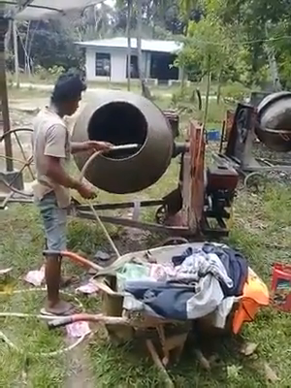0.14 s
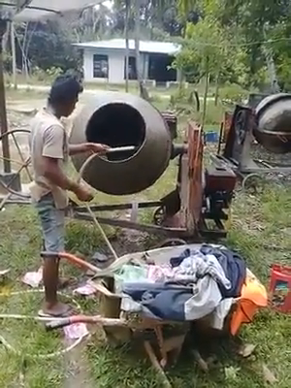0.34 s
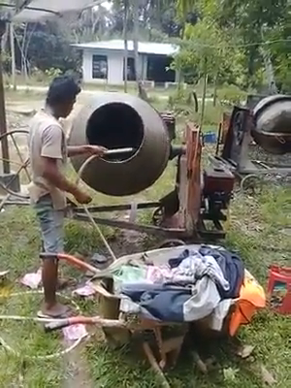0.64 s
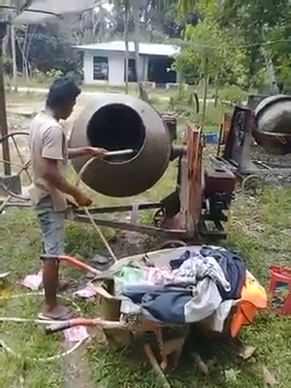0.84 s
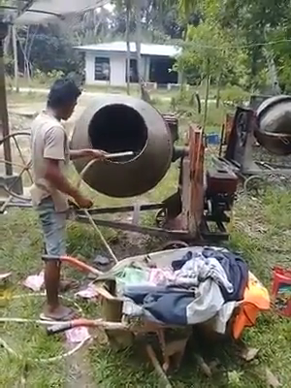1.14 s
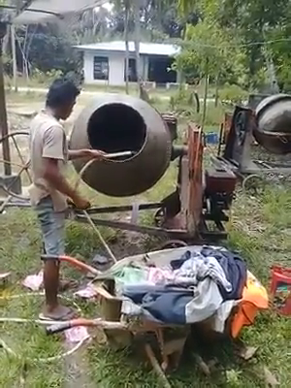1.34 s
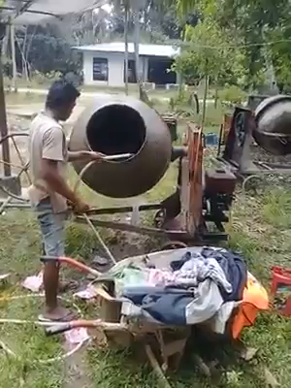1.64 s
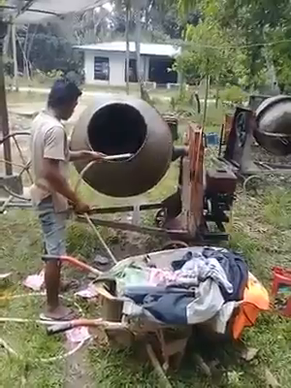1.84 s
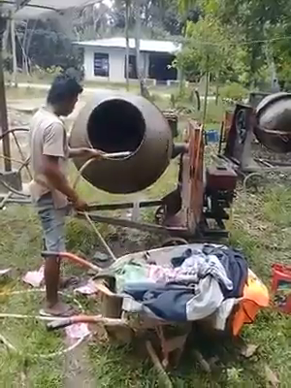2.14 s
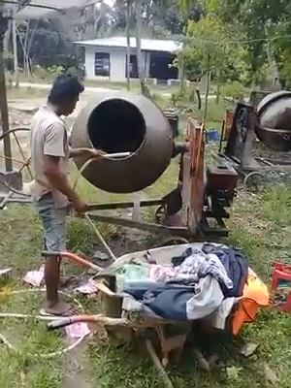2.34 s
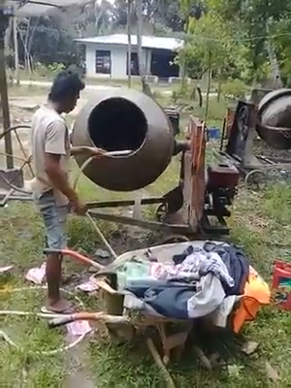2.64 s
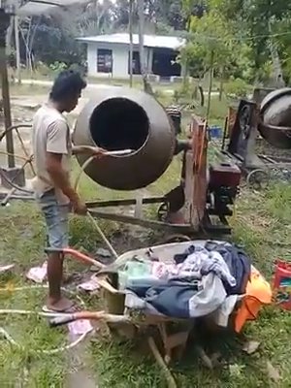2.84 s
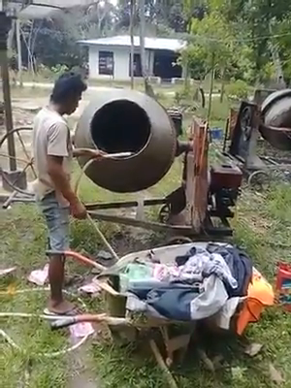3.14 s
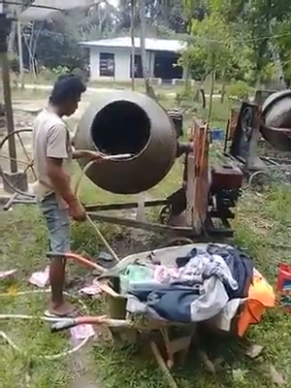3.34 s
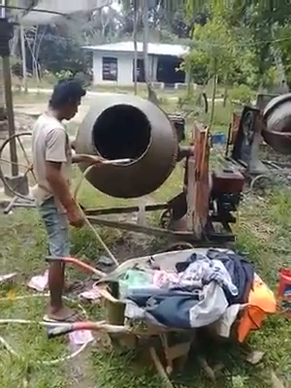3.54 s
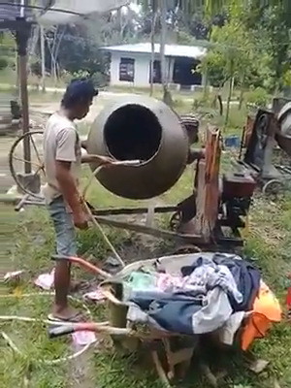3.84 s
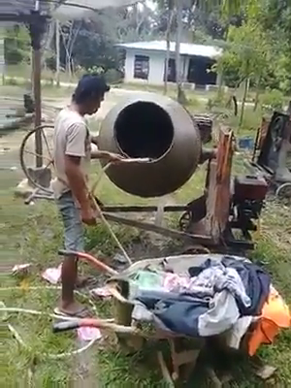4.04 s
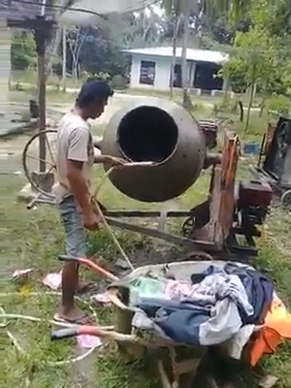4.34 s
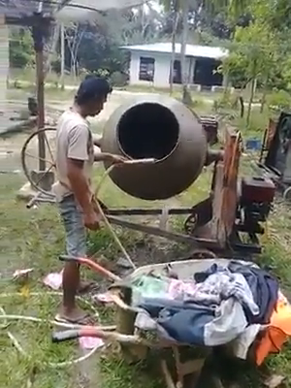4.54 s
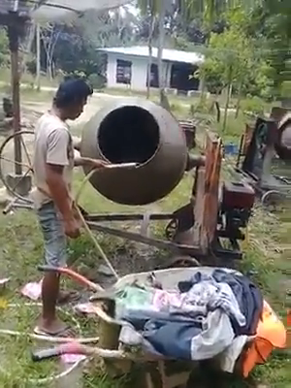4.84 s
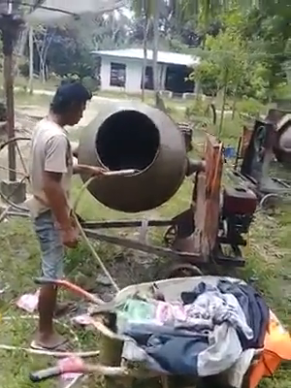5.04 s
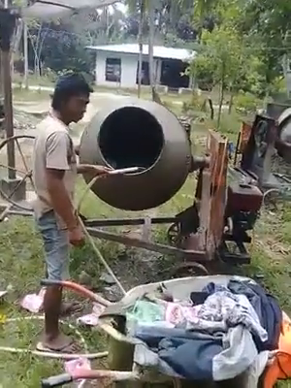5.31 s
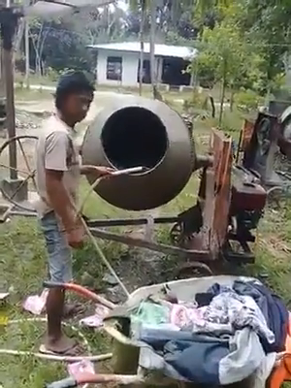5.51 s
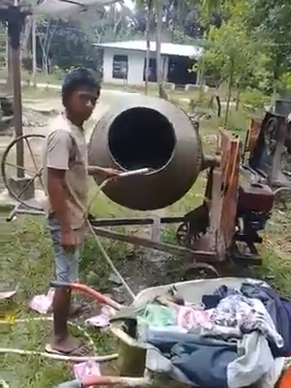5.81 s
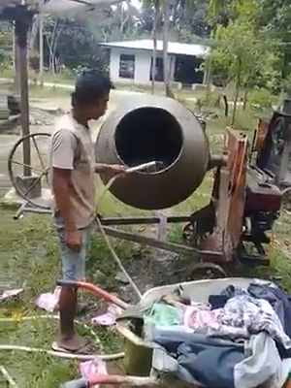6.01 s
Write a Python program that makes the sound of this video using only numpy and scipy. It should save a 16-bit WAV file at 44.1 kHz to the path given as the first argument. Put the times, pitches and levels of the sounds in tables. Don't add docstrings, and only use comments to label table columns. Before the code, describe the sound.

A slow single-cylinder engine chugs steadily about sixteen knocks a second, with a rough rattling drum roar and light wind thumps outdoors.

```python
import sys
import numpy as np
from scipy import signal
from scipy.fft import rfft, irfft
from scipy.io import wavfile
from scipy.ndimage import uniform_filter1d

SR = 44100
rng = np.random.default_rng(int(sys.argv[2]) if len(sys.argv) > 2 else 0)


def decibels_to_gain(level_db):
    exponent = np.asarray(level_db, float) / 20
    return 10 ** exponent


def transcribe(u):
    v = np.clip(np.atleast_2d(u).T, -1, 1)
    q = np.round(v * 32767).astype(np.int16)
    wavfile.write(sys.argv[1], SR, q)


N = 272097

# time in seconds, firings so far.
CRANK_PROGRESS = [(-.0223, -1), (.9117, 14), (2.0362, 32), (2.6579, 42), (3.5303, 56), (3.9672, 63),
                  (4.8442, 77), (5.7167, 91), (6.2137, 99)]
# start in seconds, peak in dB, pitch in Hz, rise in ms, decay in ms.
PORT_BUFFETS = [(0.029, -33, 60, 7, 15), (0.579, -22, 75.5, 11, 23), (0.715, -31, 48.4, 4.3, 16),
                (0.995, -24.5, 44, 3.7, 15), (1.046, -24.5, 85, 5, 10), (2.462, -30, 99.6, 3.5, 15),
                (2.793, -15, 82.4, 4.2, 11), (3.626, -19.5, 56.7, 5.3, 14), (3.689, -27.5, 83.4, 8.6, 17),
                (3.891, -25, 93, 4.7, 15), (4.17, -13, 77, 3.8, 21), (4.216, -26, 90, 4, 17),
                (4.350, -27, 80, 5.7, 10), (4.524, -21.5, 51.1, 8.2, 12), (4.938, -24, 50.6, 16, 14),
                (5.277, -19.5, 72, 4.5, 16), (5.523, -26.5, 94.5, 6.6, 6.4), (5.781, -23.5, 56.5, 11, 22),
                (6.002, -22, 57, 8.3, 39)]


def firing(firing_db, cover_db):
    # delay in ms, level in dB.
    knocks = [
        (0, 0),
        (16, -17),
    ]
    # pitch in Hz, width in Hz, peak in dB, start in ms, sign.
    block_modes = [(502, 50, -48, -3.4, 1), (587, 110, -33.5, -3.13, -1), (717, 141, -33.5, -3.13, 1),
                   (868, 146, -40, -2.8, 1), (1077, 283, -32.5, -3.4, -1), (1182, 294, -30.5, -3.28, 1),
                   (1696, 74, -48, -3.24, -1), (2375, 61, -50, -3.1, -1)]
    # pitch in Hz, width in Hz, peak in dB, start in ms, sign.
    cover_mode = (1322, 78, -35, -3.0, 1)
    blow = sum(decibels_to_gain(db) * each_cycle(ms - 4, spread_db=1.0) for ms, db in knocks)

    def uneven_blow():
        return blow * decibels_to_gain(1.2 * rng.standard_normal(N))

    block = sum(struck(uneven_blow(), *mode) for mode in block_modes)
    cover = struck(uneven_blow(), *cover_mode)
    return decibels_to_gain(firing_db) * (block + decibels_to_gain(cover_db) * cover)


def struck(clicks, hz, width_hz, db, start_ms, sign):
    t = np.maximum(np.arange(SR // 16) / SR - (start_ms + 4) / 1000, 0)
    decay = np.pi * width_hz
    swell = np.e * decay * t * np.exp(-decay * t)
    shape = swell * np.sin(2 * np.pi * hz * t)
    return sign * decibels_to_gain(db) * signal.oaconvolve(clicks, shape)[:N]


def each_cycle(delay_ms, spread_db):
    s, count = np.transpose(CRANK_PROGRESS)
    fired_s = np.interp(np.arange(-1, 100), count, s)
    at = np.round((fired_s + delay_ms / 1000) * SR).astype(int)
    size = decibels_to_gain(spread_db * rng.standard_normal(len(at)))
    inside = (at >= 0) & (at < N)
    clicks = np.zeros(N)
    clicks[at[inside]] = size[inside]
    return clicks


def exhaust():
    # multiple of the firing rate, level in dB rms.
    orders = [(8, -53), (11, -53), (12, -52), (15, -57), (17, -55.5), (19, -70), (24, -54)]
    # delay after the firing in ms, level in dB, pitch in Hz, width in Hz.
    puffs = [
        (2, -38, 341, 107),
        (16.04, -56, 240, 35),
        (30.14, -35, 380, 53),
    ]
    angle = 2 * np.pi * (in_time(CRANK_PROGRESS)[0] + 0.0964)
    out = np.zeros(N)
    for order, db in orders:
        out += decibels_to_gain(db + 2.6 * drift(5.3)) * np.sqrt(2) * np.cos(order * angle)
    for ms, db, hz, width_hz in puffs:
        once = ring(each_cycle(ms, spread_db=1.0), hz, width_hz)
        out += decibels_to_gain(db) * width_hz * 5.1 / SR * ring(once, hz, width_hz)
    return out


def ring(clicks, hz, width_hz):
    r = np.exp(-np.pi * width_hz / SR)
    w = 2 * np.pi * hz / SR
    return signal.lfilter([0, np.sin(w)], [1, -2 * r * np.cos(w), r * r], clicks + 1e-18)


def roar(roar_db, bass_db):
    # delay after the firing in ms, centre in Hz, width in octaves,
    # level in dB above the roar, decay in ms.
    rattles = [
        (1.48, 1530, 0.55, -8.5, 4.6),
        (36, 1800, 0.81, -18, 16),
    ]
    # frequency in Hz, density in dB per Hz.
    roar_spectrum = [(65, -7), (110, -6.5), (184, -3), (374, -2.5), (450, -8), (580, -8.5), (720, -3.5),
                     (999, -10.5), (1310, -3.5), (1450, -9.5), (1670, -5.5), (1950, -7.5), (2650, -3),
                     (3000, -6.5)]
    bursts = []
    for ms, _, _, _, decay_ms in rattles:
        fade = np.exp(-1000 / (decay_ms * SR))
        bursts.append(signal.lfilter([1], [1, -fade], each_cycle(ms, spread_db=3.0)))
    white, slosh, grit = rng.standard_normal((2, N)), drift(3.0), drift(99)
    edges = 90 * 2 ** (np.arange(19) / 3)
    out = np.zeros(N)
    for k, (low, high) in enumerate(zip(edges, edges[1:])):
        hz = np.sqrt(low * high)
        lift = np.zeros(N)
        for burst, (_, mid_hz, octaves, db, _) in zip(bursts, rattles):
            lift += decibels_to_gain(db) * np.exp(-.5 * (np.log2(hz / mid_hz) / octaves) ** 2) * burst
        flicker_db = 0.16 * slosh + 0.92 * grit * (hz > 1400) + 0.75 * drift(3.5)
        gain = decibels_to_gain(flicker_db) * (1 + lift)
        band_filter = signal.butter(2, [low, high], "band", fs=SR, output="sos")
        band = signal.sosfilt(band_filter, white[k % 2])
        out += band * rms_one(gain) * decibels_to_gain(bass_db * (hz < 520))
    return decibels_to_gain(roar_db) * rms_one(colour(out, roar_spectrum))


def buffets():
    out = np.zeros(N)
    for s, db, hz, rise_ms, decay_ms in PORT_BUFFETS:
        near = slice(max(int((s - .05) * SR), 0), int((s + .3) * SR))
        late = np.arange(N)[near] / SR - s - .022
        rise = np.minimum(late, 0) * 1000 / rise_ms
        decay = np.maximum(late, 0) * 1000 / decay_ms
        swell = np.exp(-.5 * rise ** 2 - decay)
        slowing = 1.1 - 4.1 * np.clip(late, -.04, .05)
        out[near] -= decibels_to_gain(db) * swell * np.cos(2 * np.pi * hz * late * slowing)
    return out


def wind():
    # frequency in Hz, density in dB per Hz.
    gust_spectrum = [(8.8, -44), (15, -7.5), (54, 2), (71, 0.5), (127, -11), (151, -15), (178, -11),
                     (200, -14.5), (260, -38), (440, -120)]
    level_db = turbulence_db()
    noise = rms_one(colour(rng.standard_normal(N), gust_spectrum))
    lumps = uniform_filter1d(noise ** 2, size=3500) ** 0.18
    return decibels_to_gain(level_db + 0.7) * noise / lumps


def turbulence_db():
    # time in seconds, level in dB.
    breeze = [
        (0, -41),
        (2.3, -38.5),
        (3.4, -40),
        (4.5, -36.5),
        (6.17, -39),
    ]
    stirs = [(row[0] + .022, .45 * row[1] - 29) for row in PORT_BUFFETS]
    stirred = swells(stirs, rise_s=0.048, fall_s=0.052)
    return 10 * np.log10(decibels_to_gain(2 * in_time(breeze)[0]) + stirred)


def swells(events, rise_s, fall_s):
    s, db = np.transpose(events)[:, :, None]
    grid = np.arange(0, N + 40, 40)
    late = grid / SR - s
    rise = np.minimum(late, 0) / rise_s
    decay = np.maximum(late, 0) / fall_s
    power = decibels_to_gain(2 * db) * np.exp(-.5 * rise ** 2 - decay)
    return np.interp(np.arange(N), grid, power.sum(axis=0))


def rms_one(x):
    return x / np.sqrt(np.mean(x ** 2) + 1e-20)


def in_time(rows):
    s, *columns = np.transpose(rows)
    return [np.interp(np.arange(N) / SR, s, c) for c in columns]


def colour(x, points):
    hz, db = np.transpose(points)
    grid = np.maximum(np.arange(N // 2 + 1) * SR / N, 1)
    gain_db = np.interp(np.log(grid), np.log(hz), db)
    return irfft(rfft(x) * decibels_to_gain(gain_db), N)


def drift(rate):
    r = np.exp(-80 * np.pi * rate / SR)
    white = rng.standard_normal(N // 40 + 2002)
    slow = signal.lfilter([1], [1, -2 * r, r * r], white)[2000:]
    return np.interp(np.arange(N) / 40, np.arange(len(slow)), rms_one(slow))


def starve(x):
    # frequency in Hz, share 0-1 that survives.
    thin_bands = [(1000, 1), (1350, .97), (1450, .7), (1560, .95), (2000, .9), (2300, .97), (3100, .97)]
    starved_hz = (3420, 3720, 3970)
    size, lines = 4096, 420
    taper = np.sin(np.pi / 2 * np.sin(np.pi * (np.arange(size) + .5) / size) ** 2)
    hz, s, z = signal.stft(x, SR, window=taper, nperseg=size)
    bands = hz[0:lines:6] + 27
    thin_hz, thin = np.transpose(thin_bands)
    curve_hz = [*thin_hz, *starved_hz, 4260]
    survive = [np.interp(bands, curve_hz, [*thin, *shares ** 1.7, .9]) for shares in spare_bits(s)]
    per_frame = 1 - (1 - np.clip(np.transpose(survive), 0, 1)) ** .6
    kept = rng.random(per_frame.shape) < per_frame
    z[:lines] *= np.repeat(kept, 6, axis=0)
    return signal.istft(z, SR, window=taper, nperseg=size)[1][:N]


def spare_bits(s):
    # time in seconds, share 0-1 that survives near 3400 Hz, near 3720 Hz, near 4000 Hz.
    spare = [
        (0, .5, .62, .3),
        (3.0, .45, .55, .22),
        (6.17, .16, .6, .62),
    ]
    at = np.minimum((s * SR).astype(int), N - 1)
    supply = .1 + .9 * reserve(s)
    shares = [(trend + .1 * drift(4.0))[at] * supply for trend in in_time(spare)]
    return np.clip(shares, 0, 1).T


def reserve(s):
    # middle of the shortage in seconds, half its length in seconds.
    shortages = [(.62, .09), (.75, .04), (1.48, .04), (1.79, .07), (2.42, .04), (3.0, .05), (4.06, .04),
                 (4.37, .04), (4.76, .09), (5.05, .04), (5.47, .07), (5.862, .12)]
    return np.prod([1 - np.exp(-((s - mid_s) / half_s) ** 4) for mid_s, half_s in shortages], axis=0)


def treble_power_db():
    # start in seconds, peak in dB.
    firing_lifts = [(0.2808, -48.5), (0.4105, -54), (0.5694, -52), (0.6594, -52), (0.7394, -60),
                    (0.9594, -54), (1.0959, -47.5), (1.2855, -59), (1.3594, -61), (2.7212, -52),
                    (2.8394, -52), (3.1094, -53), (4.2794, -54), (4.4638, -61), (4.6533, -59),
                    (4.9691, -53), (5.1535, -50.5), (5.6511, -50), (5.7394, -58), (6.1494, -54)]
    spray_db, valve_db = -67, -67
    rise_s, fall_s = 0.0061, .018
    lifts = swells([(s + rise_s, db - 7.5) for s, db in firing_lifts], rise_s, fall_s)
    tick_power = each_cycle(-13, spread_db=3.5) ** 2
    ticks = signal.lfilter([1], [1, -np.exp(-1 / (fall_s * SR))], tick_power)
    return 10 * np.log10(decibels_to_gain(2 * spray_db) + lifts + decibels_to_gain(2 * valve_db) * ticks)


def rebuild_treble(full, starved):
    # frequency in Hz, level in dB.
    treble_envelope = [(4380, -80), (4520, -0.5), (6400, -1), (6900, -7), (7300, -7.5), (8300, -14),
                       (9700, -18), (10400, -23.5), (10800, -26), (12000, -29.5), (13800, -33),
                       (14600, -39), (15100, -44), (15250, -69)]
    low, step = round(750 * N / SR), round(3750 * N / SR)
    flat = rfft(starved) / np.sqrt(uniform_filter1d(abs(rfft(full)) ** 2, size=500))
    splash_db = treble_power_db()
    swing_db = splash_db - splash_db.mean()
    out = np.zeros(N)
    for k, (follow, patchy_db) in enumerate([(0.45, .9), (0.57, 0.99), (0.45, 1.1)]):
        top = np.zeros(N // 2 + 1, complex)
        top[low + (k + 1) * step:low + (k + 2) * step] = flat[low:low + step]
        patches = drift(12) + 1.67 * drift(33)
        out += decibels_to_gain(follow * swing_db + patchy_db * patches) * irfft(top, N)
    s = np.arange(0, N / SR + .01, .01)
    fill = decibels_to_gain(-31) + decibels_to_gain(-11.5) * np.interp(np.arange(N) / SR, s, reserve(s))
    copies = rms_one(out) + fill * rng.standard_normal(N)
    return decibels_to_gain(-54) * rms_one(colour(copies, treble_envelope))


def scene():
    # time in seconds, firing in dB, cover ping in dB, roar in dB,
    # bass of the roar in dB.
    load = [
        (0.0, 2.5, 2.5, -31, -1),
        (2.85, 1, 4, -31, -2),
        (3.86, 2, 0.5, -30, -1.5),
        (4.61, 2, 0, -32, -1.5),
        (4.95, 2.5, -6, -29, -3.5),
        (5.48, 3, -11, -31, -6),
        (6.17, 2.5, -0.5, -30.5, -3.5),
    ]
    firing_db, cover_db, roar_db, bass_db = in_time(load)
    engine = firing(firing_db, cover_db) + exhaust()
    drum = roar(roar_db, bass_db)
    air = wind() + buffets()
    return (engine + drum + air)[None]


def low_pass(x):
    return signal.sosfilt(signal.butter(12, 15140, fs=SR, output="sos"), x)


def record(dry):
    # frequency in Hz, level in dB.
    kept_band_shape = [(3000, -1), (3200, -6), (3450, -12), (3750, -4.5), (3950, -11), (4150, -8.5),
                       (4400, -7.5), (4520, -39), (4700, -59)]
    full = colour(dry[0], kept_band_shape)
    starved = starve(full)
    both = starved + rebuild_treble(full, starved)
    return low_pass(both[None])


dry = scene()
out = record(dry)
transcribe(out)
```